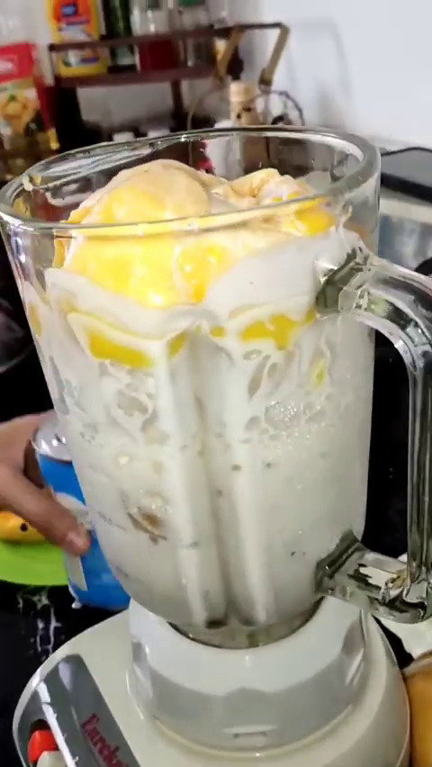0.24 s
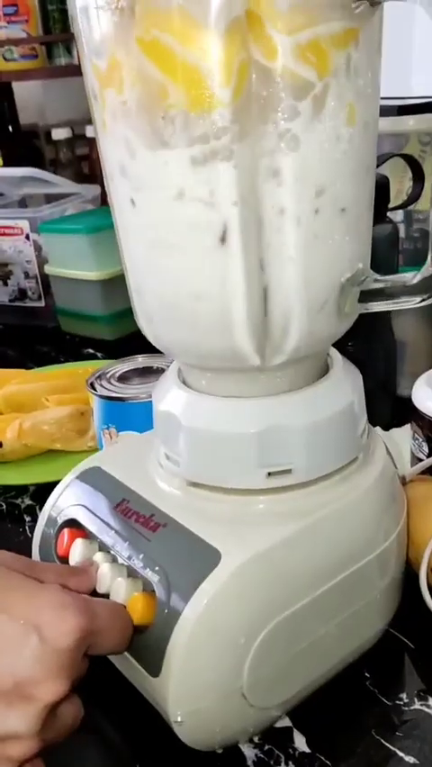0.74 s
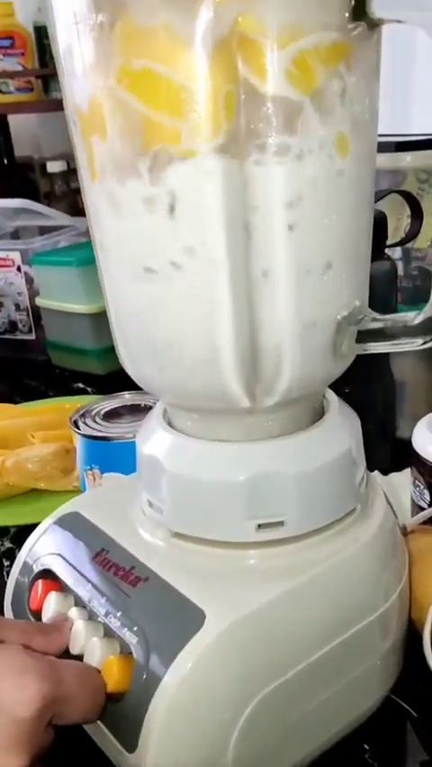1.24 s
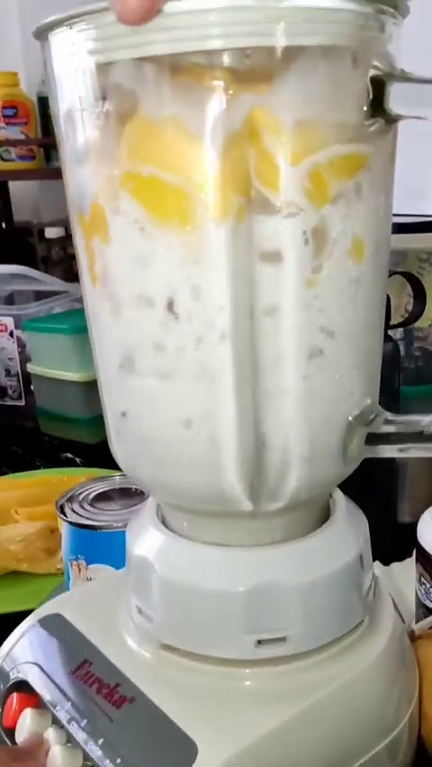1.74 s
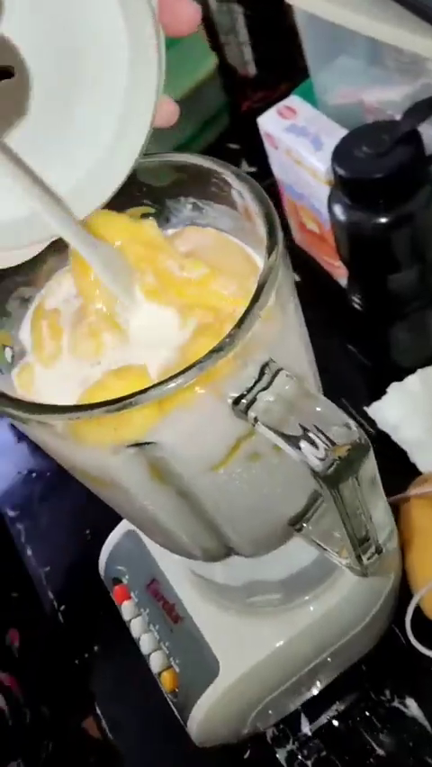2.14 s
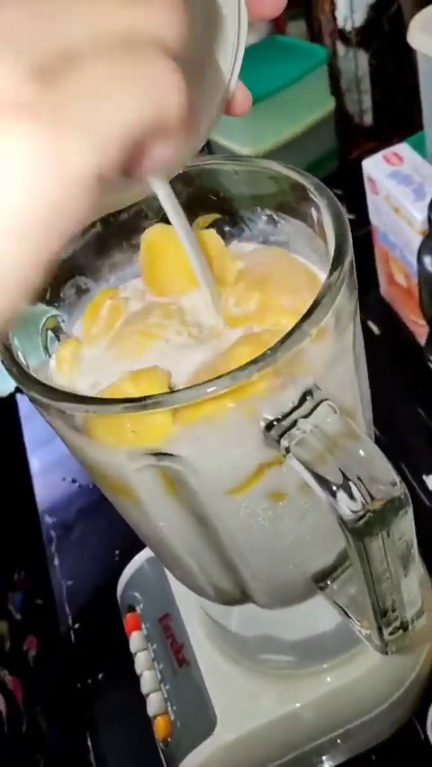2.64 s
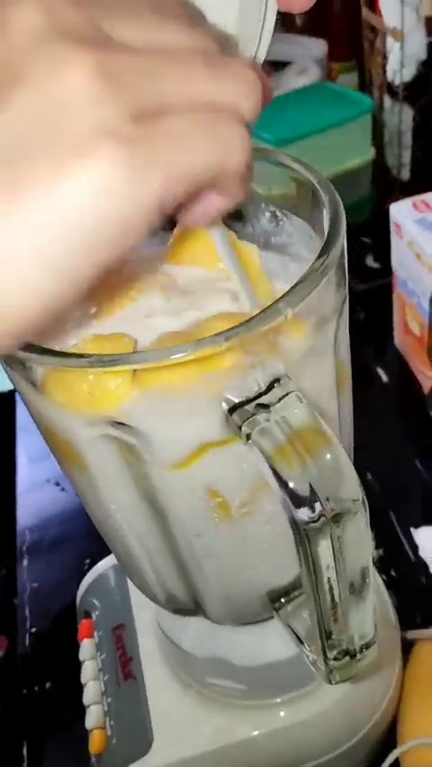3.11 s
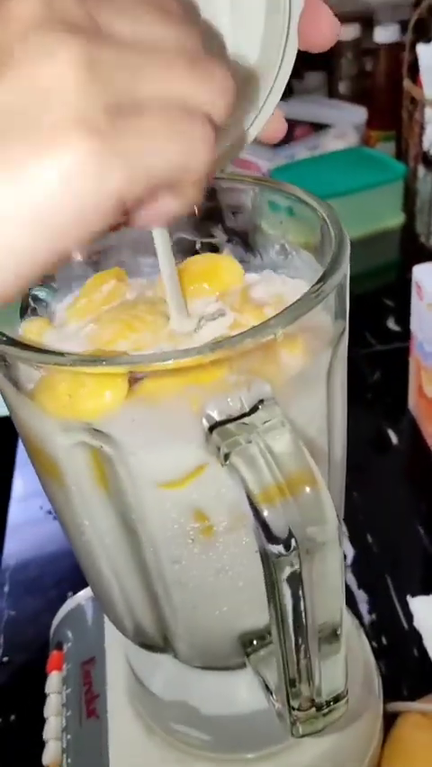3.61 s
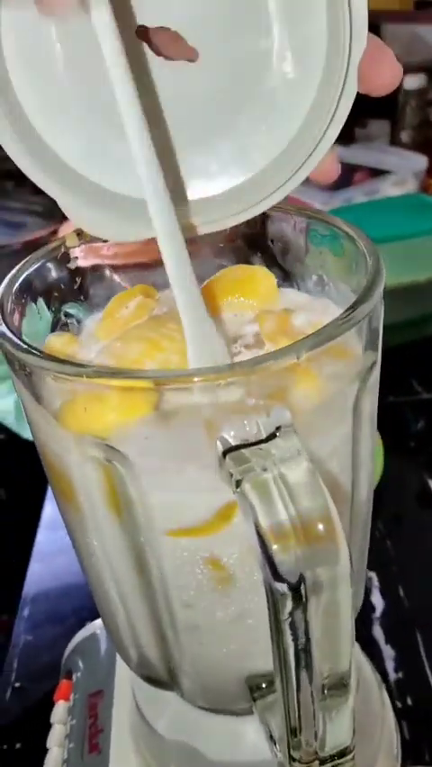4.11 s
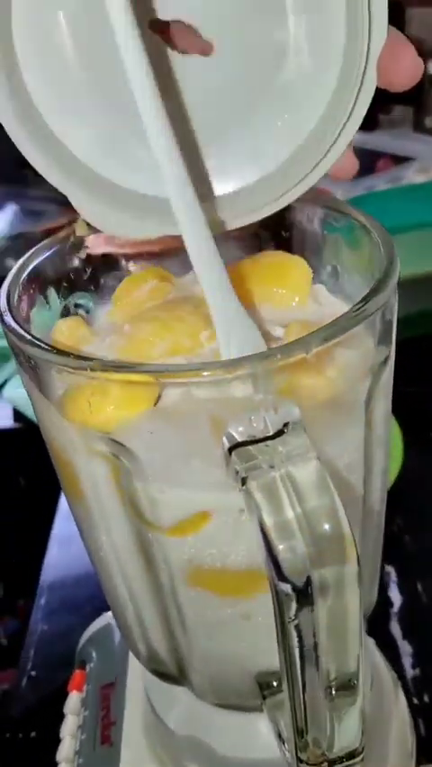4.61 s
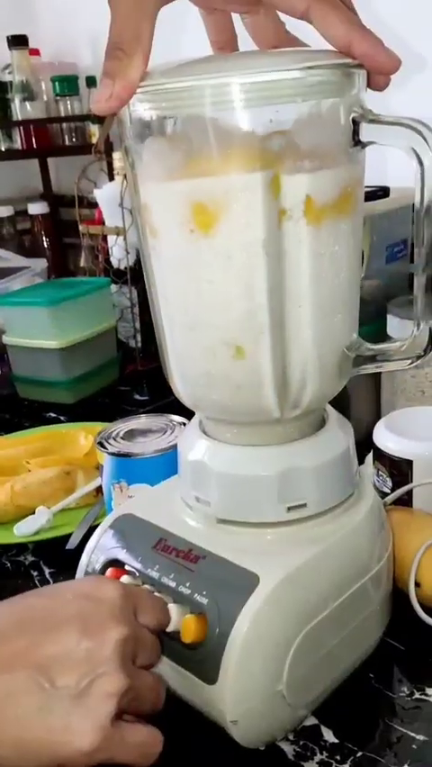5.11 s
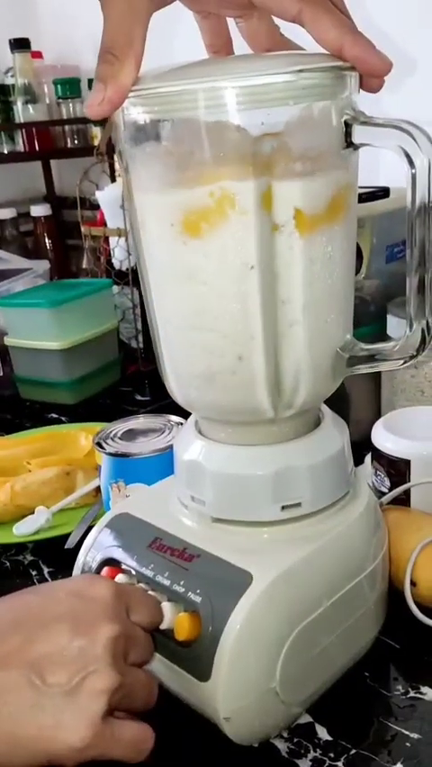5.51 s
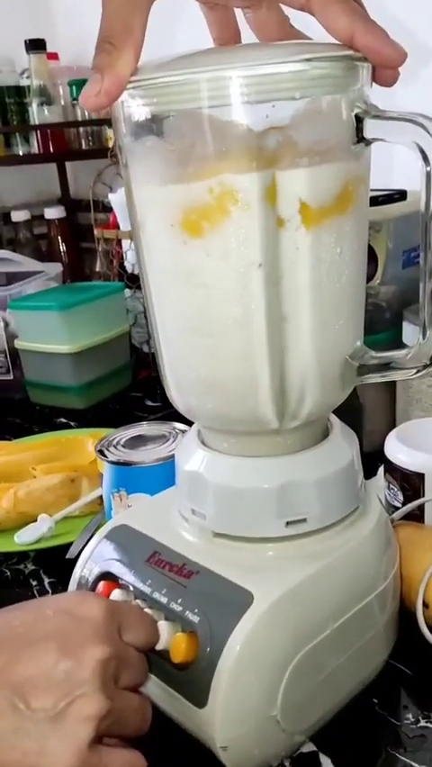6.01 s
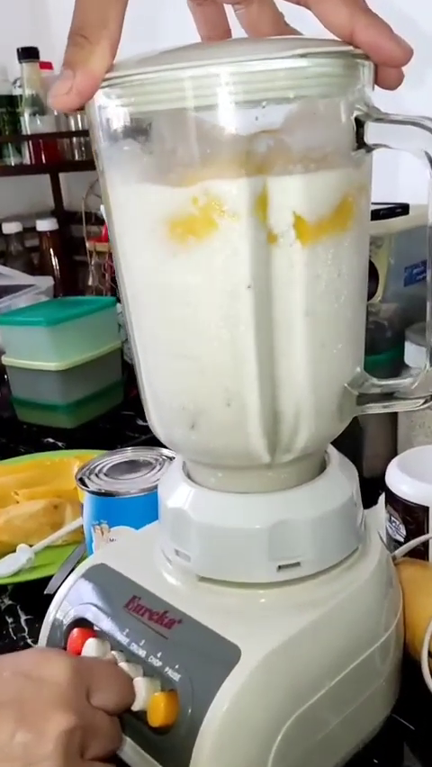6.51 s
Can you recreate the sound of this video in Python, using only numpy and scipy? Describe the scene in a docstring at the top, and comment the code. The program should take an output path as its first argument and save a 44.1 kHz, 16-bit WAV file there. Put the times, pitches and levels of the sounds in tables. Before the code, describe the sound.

A faint appliance hum over soft hiss opens the scene, close up in a small kitchen with a very short echo. At about 0.45 seconds a blender starts crushing fruit and ice in milk: the liquid churns with hollow gulps, the housing whines, and ice makes a dense, bright rattle against the ringing glass jar, with surges and a few sharp cracks. It stops dead at about 2 seconds. The quiet hum returns, and a spoon pushes through the slush in uneven strokes, squelching, popping small air pockets and crunching ice. Spoon and ice knock on the jar, most sharply around 2.9, 3.2 and 3.6 seconds. At about 4.9 seconds the blender cuts in abruptly again, a little brighter, churning and rattling with occasional ice cracks. It swells near 5.7 seconds and runs until the end, at about 6.7 seconds.

```python
"""A glass-jar blender crushes fruit and ice in milk, close up in a small kitchen. An appliance hums over soft
hiss, then the blades bite: the liquid churns, the housing whines and ice batters the ringing glass. At about 2
s the scene changes abruptly: over the hum, a spoon squelches and crunches through the slush and knocks on the
jar. Near 5 s a second burst cuts in and runs to the end."""
import sys
import numpy as np
from scipy import signal
from scipy.fft import rfft, irfft
from scipy.io import wavfile
from scipy.ndimage import uniform_filter1d

SR = 44100
rng = np.random.default_rng(int(sys.argv[2]) if len(sys.argv) > 2 else 0)


def store_wav(level_fs):
    """Save 16-bit WAV to argv[1]."""
    pcm = np.round(np.clip(np.atleast_2d(level_fs), -1, 1) * 32767)
    wavfile.write(sys.argv[1], SR, pcm.T.astype(np.int16))


N = 297675
TIME = np.arange(N) / SR
HZ = np.fft.rfftfreq(N, 1 / SR)

# the blender rests (start [s], end [s])
PAUSES = [(-.01, .408), (2.056, 4.917)]
# how alike left and right are (frequency [Hz], likeness [0-1])
LIKENESS = [(60, 0.48), (130, 0.7), (350, 0.71), (700, 0.68), (1500, 0.35), (4000, 0.02), (14000, 0)]
# tone of the jar when struck or stirred (frequency [Hz], relative level [dB])
STRUCK_JAR_SLOPE = [(230, -47), (300, -21.5), (480, -12), (800, -12), (1600, -2), (3000, -0.5),
                    (5500, -0.5), (9000, -11), (11500, -3), (14200, -9)]
# its resonances (frequency [Hz], width [Hz], lift over the slope [dB])
STRUCK_JAR_MODES = [(349.5, 57, 22), (613, 130, 13.1), (857, 140, 9), (1080, 270, 9), (1540, 310, 1.5),
                    (1940, 400, 0.3), (4560, 2900, 3.1), (5400, 1100, 1.6), (9100, 2000, 16.1)]


def gain_of(db):
    """Decibels to a factor."""
    return 10 ** (np.asarray(db) / 20)


def unit_rms(x):
    """Scales to an rms of 1 (a stereo pair by its mid signal)."""
    return x / np.sqrt(np.mean(np.atleast_2d(x).mean(0) ** 2) + 1e-20)


def read(points, hz):
    """Reads a spectrum on a log-frequency axis."""
    f, value = np.transpose(points)
    return np.interp(np.log(hz + 1), np.log(f + 1), value)


def curves(rows):
    """Each column after the first as a curve over time."""
    s, *columns = np.transpose(rows)
    return [np.interp(TIME, s, column) for column in columns]


def gate(start, end):
    """Open between two moments, with millisecond edges."""
    return np.clip(np.minimum(TIME - start, end - TIME) * 1000, 0, 1)


def wander(rate_hz):
    """Smooth random drift with an rms of 1."""
    coarse = TIME[::32]
    hz = np.fft.rfftfreq(len(coarse), coarse[1])
    slow = irfft(rfft(rng.standard_normal(len(coarse))) / (1 + (hz / rate_hz) ** 2), len(coarse))
    return np.interp(TIME, coarse, unit_rms(slow))


def below(edge_hz):
    """Low side of a steep crossover, as a gain."""
    return 1 / np.sqrt(1 + (HZ / edge_hz) ** 12)


def above(edge_hz):
    """High side of the same crossover."""
    return np.sqrt(1 - below(edge_hz) ** 2)


def body(slope, modes):
    """Gain of a struck body: resonances on a slope."""
    peaks = sum(db / (1 + (2 * (HZ - hz) / width) ** 2) for hz, width, db in modes)
    return gain_of(read(slope, HZ) + peaks)


def ring(x, gain):
    """Minimum-phase filter: each click in x rings on after it lands."""
    cepstrum = irfft(np.log(np.maximum(gain / gain.max(), 1e-4)), N)
    cepstrum[1:] *= 2 * (np.arange(1, N) < N // 2)
    return irfft(rfft(x) * np.exp(rfft(cepstrum)), N)


def resonate(x, hz, width_hz):
    """A resonance that glides along the curve hz."""
    turn = np.exp(2j * np.pi * np.cumsum(hz) / SR)
    pole = np.exp(-np.pi * width_hz / SR)
    return 2 * (turn * signal.lfilter([1 - pole], [1, -pole], x / turn + 1e-18)).real


def impacts(per_s, spread_db):
    """Random clicks, mostly small; each lands elsewhere, so left and right get it differently."""
    size = gain_of(spread_db * np.minimum(rng.exponential(1, N), 4))
    polarity = rng.choice([-1, 1], (2, N))
    return unit_rms(size * polarity * (rng.random(N) < per_s / SR))


def diffuse(pair):
    """Makes two unrelated signals alike in the bass."""
    a, b = rfft(pair, N)
    same = np.clip(read(LIKENESS, HZ), 0, 1)
    return irfft(np.array([a, same * a + np.sqrt(1 - same ** 2) * b]), N)


def place(pair, pan, lag_ms):
    """Stereo image: alike in the bass, panned by frequency, later on the left; rms 1."""
    side = np.exp(-1j * np.pi * HZ * lag_ms / 1000) * gain_of(read(pan, HZ) / 2)
    return unit_rms(irfft(rfft(diffuse(pair)) * np.array([side, 1 / side]), N))


def appliance_hum():
    """An appliance hums, wavering slightly, over soft hiss; both sound only in the pauses."""
    # hum partials, one table a pause (frequency [Hz], level [dB])
    hum_partials = [
        [(59.2, -49.5), (118.4, -59), (441.4, -62.5)],
        [(59.2, -50.5), (118.4, -61.5), (145.3, -60), (220.7, -71.5), (360.7, -58), (527.6, -65)],
    ]
    # colour of the kitchen hiss (frequency [Hz], relative level [dB])
    hiss_colour = [(25, -6.5), (50, -9), (90, -15), (150, -18), (220, -21.5), (450, -19), (750, -20),
                   (900, -20), (1400, -18.5), (3400, -17), (6000, -20.5), (9200, -17), (11500, -20),
                   (14200, -29.5)]
    noise = irfft(rfft(rng.standard_normal((2, N))) * gain_of(read(hiss_colour, HZ)), N)
    hiss = gain_of(-43.7) * unit_rms(diffuse(noise))
    out = np.zeros((2, N))
    for span, partials in zip(PAUSES, hum_partials):
        hum = np.zeros(N)
        for hz, db in partials:
            level = np.sqrt(2) * gain_of(db + 0.66 * wander(rate_hz=1))
            hum += level * np.sin(2 * np.pi * hz * TIME + 0.52 * wander(rate_hz=1))
        out += (hum + hiss) * gate(*span)
    return out


def blender(burst):
    """Blades churn the liquid, grind pulp, shake the housing and fling ice at the ringing glass."""
    # the motor runs (start [s], end [s])
    burst_spans = [(.449, 2.056), (4.917, 6.76)]
    # slow course of the load, per burst (time [s], churn [dB], housing [dB], ice on glass [dB])
    load_levels = [
        [(.47, -36.5, -32, -27.5), (.56, -32.5, -31.5, -26), (.64, -30.5, -27.5, -21),
         (.81, -34.5, -29.5, -25.5), (1.06, -31.5, -26.5, -23), (1.13, -24.5, -28, -23),
         (1.33, -30.5, -27.5, -24), (1.46, -26.5, -23, -19), (1.7, -31.5, -28, -24), (2.05, -31, -27.5, -22.5)],
        [(4.92, -32, -26, -21.5), (5.17, -30.5, -26.5, -20.5), (5.42, -29.5, -27, -22), (5.58, -28, -24, -20.5),
         (5.72, -28.5, -21, -16), (5.825, -34.5, -28, -22.5), (5.96, -28.5, -26.5, -21.5),
         (6.22, -31, -28.5, -23), (6.37, -31.5, -27, -22), (6.75, -34, -26, -22.5)],
    ]
    # how freely things ring as the load shifts, per burst
    # (time [s], whine re housing [dB], low glass ring re ice [dB], high glass ring re ice [dB])
    ring_levels = [
        [(.5, -24, -10, -14), (.72, -16, -9, -9), (1, -23, -1, -5.5), (1.2, -19, -17, -17),
         (1.45, -10.5, -2.5, -10), (1.66, -2.5, -1, -10), (1.8, -6.5, -6, -20), (1.93, -6.5, -20, -4.5),
         (2.05, -8, -13, -17)],
        [(4.95, -7, -21, -5.5), (5.25, -8, -16, -4), (5.42, -12, -27, -17), (5.7, -8, -21, -6),
         (5.9, -9, -16, -13), (6.12, -13, -4, -10), (6.3, -6, -17, -7), (6.48, -6, -7, -5),
         (6.66, -5, -0.5, -8)],
    ]
    # tone of jar and housing, per burst (frequency [Hz], relative level [dB])
    jar_slopes = [
        [(700, -15), (1000, -11), (1400, -11.5), (2050, -1.5), (2500, -3.5), (2900, -9), (4500, -8.5),
         (6200, -14.5), (8200, -13), (8900, -4.5), (9700, -11.5), (10500, -6.5), (11050, -12), (11500, -15),
         (12700, -15), (14200, -19.5)],
        [(700, -11), (1000, -15), (1500, -14.5), (2100, -7.5), (2600, -10.5), (3300, -12.5), (4500, -10.5),
         (6200, -12), (7600, -8.5), (8500, -4.5), (9600, -3), (10500, -4), (11050, -6.5), (12000, -8),
         (14200, -15)],
    ]
    # peaks and dips in their tone (frequency [Hz], width [Hz], lift over the slope [dB])
    jar_modes = [(1103, 180, 3), (1510, 98, 3), (3090, 87, 2.5), (3580, 98, 0), (4114, 110, 3.5),
                 (4300, 180, -1), (5360, 40, 10), (5810, 115, 7), (6300, 270, 2), (6760, 140, 6.5),
                 (7370, 120, 2.5)]
    # stereo balance, per burst (frequency [Hz], left minus right [dB])
    blender_pans = [
        [(60, -3), (200, 5.5), (700, 6), (1200, 6), (2000, 1.5), (2700, 3.5), (3300, 6.5), (4200, 4), (5000, 3),
         (7500, 0.5), (8500, 1), (8900, -8), (9300, -8.5), (9700, 6), (10400, 3), (11000, 17), (11900, 2),
         (13200, 7), (14500, -1)],
        [(60, -3), (200, 5), (1000, 5.5), (1400, 2), (2600, 4), (3100, 6.5), (4600, 1.5), (5300, 1.5),
         (5850, 5.5), (6700, -1), (8000, -2.5), (9250, -5), (9700, 2), (10400, 8), (11000, 6.5), (12400, 5.5),
         (14500, 6)],
    ]
    start, end = burst_spans[burst]
    pan = blender_pans[burst]

    churn_db, housing_db, ice_db = curves(load_levels[burst])
    whine_db, low_ring_db, high_ring_db = curves(ring_levels[burst])
    rattle_surge, churn_surge = ice_catches()
    ice_db += rattle_surge
    housing_db += 0.83 * rattle_surge  # only part of a surge reaches the housing
    churn_db += churn_surge
    pulp_db = -30.5 + 0.93 * (churn_db + 28)  # follows the churn around its usual -28 dB
    churn_db += vortex_gulps(start, end)
    whine_db += 2 * wander(rate_hz=22)

    throb = 1 + 0.025 * np.cos(2 * np.pi * 60 * TIME)  # the motor's pull pulses with the mains
    lumps = gain_of(wander(rate_hz=23)) * throb  # small pieces are caught and let go
    showers = lumps * blade_beat() * gain_of(0.52 * wander(rate_hz=72))  # ice hits the glass unevenly
    jar = body(jar_slopes[burst], jar_modes)
    pulp = ring(impacts(per_s=4000, spread_db=3) * lumps, jar * above(927) * below(1465))
    housing = ring(impacts(per_s=9000, spread_db=2) * lumps, jar * above(1356) * below(5100))
    ice = ring(impacts(per_s=9000, spread_db=1) * showers, jar * above(5850))

    sound = gain_of(churn_db) * place(churning(burst, lumps), pan, lag_ms=0.11)
    sound += gain_of(pulp_db) * place(pulp, pan, lag_ms=0.25)
    sound += gain_of(housing_db) * place(housing, pan, lag_ms=0.41)
    sound += gain_of(ice_db) * place(ice, pan, lag_ms=0.4125)
    sound += gain_of(housing_db + whine_db) * singing(lumps, pan, hz=2315, width_hz=110)
    sound += gain_of(ice_db + low_ring_db) * singing(showers, pan, hz=8930, width_hz=480)
    sound += gain_of(ice_db + high_ring_db) * singing(showers, pan, hz=9230, width_hz=220)
    bite_s = 0.019 if burst == 0 else 0.0039
    attack = 1 - np.exp(-np.maximum(TIME - start, 0) / bite_s)
    return kitchen(flutter(sound, depth_db=3.5) * attack, wet_db=-11) * gate(start, end)


def churning(burst, lumps):
    """Dense slaps of liquid boom in the hollow of base and jar."""
    # tone of the churn, per burst (frequency [Hz], relative level [dB])
    churn_slopes = [
        [(18, -42), (30, -20), (96, -24.5), (160, -22.5), (200, -16), (243, -18.5), (284, -7.5), (389, -1),
         (442, -1), (502, -11), (587, -8), (717, -7.5), (838, -11), (900, -4), (1170, -27), (1980, -120)],
        [(18, -69), (30, -24), (65, -24.5), (96, -35.5), (123, -22), (190, -26), (240, -28.5), (300, -8.5),
         (337, -2), (400, 1), (474, -7), (517, -17), (587, -14), (658, -20.5), (900, -3), (1170, -48),
         (1980, -120)],
    ]
    # hollow resonances (frequency [Hz], width [Hz], lift over the slope [dB])
    hollow_modes = [(302, 25, -1.5), (424, 81, 0.5), (594, 37, 3.5), (668, 37, -2)]
    hollow = body(churn_slopes[burst], hollow_modes) * below(786)
    return ring(impacts(per_s=2000, spread_db=1) * lumps, hollow)


def blade_beat():
    """The ice rattle swells briefly once in every turn of the blades."""
    # the motor labours in the thick load and frees itself (time [s], speed [turns/s], beat depth [-])
    motor_course = [(.45, 40, .08), (.55, 120, .1), (.68, 132, 0.22), (1.0, 116, 0.11), (2.05, 150, .05),
                    (4.92, 150, .05), (5.05, 160, .15), (5.3, 152, 0.14), (5.5, 155, 0.047),
                    (5.97, 159, 0.073), (6.12, 162, 0.19), (6.33, 164, 0.33), (6.48, 170, 0.3),
                    (6.75, 171, 0.23)]
    speed_hz, depth = curves(motor_course)
    turn = 2 * np.pi * np.cumsum(speed_hz) / SR
    return np.exp(depth * (np.cos(turn) + 0.63 * np.cos(2 * turn) + 0.3 * np.cos(3 * turn)))


def singing(drive, pan, hz, width_hz):
    """A strong mode of housing or glass, fed by dense impacts and detuned a little by the load."""
    pitch = hz * (1 + 0.0032 * wander(rate_hz=3.8))
    hits = impacts(per_s=3000, spread_db=0.5) * drive
    tone = resonate(resonate(hits, pitch, width_hz), pitch, width_hz)
    left_db = read(pan, hz)
    return unit_rms(tone * gain_of(np.array([[left_db], [-left_db]]) / 2))


def flutter(x, depth_db):
    """Random, brief dips and lifts in narrow bands between 1.4 and 8.3 kHz make the rattle waver."""
    hz, _, spectra = signal.stft(x, SR, nperseg=1024)
    patches = uniform_filter1d(rng.standard_normal(spectra.shape[1:]), size=4, axis=0)
    patches = uniform_filter1d(patches, size=8, axis=1)
    band = (hz > 1400) & (hz < 8300)
    gain = gain_of(depth_db * np.minimum(patches / patches.std(), 1) * band[:, None])
    return signal.istft(spectra * gain, SR, nperseg=1024)[1][:, :N]


def vortex_gulps(start, end):
    """The vortex gulps and the churn thumps: extra dB over time."""
    # gulps (time [s], level change [dB])
    gulp_peaks = [(.635, 2.5), (.667, 3), (.755, 6), (.885, 7.5), (.915, -2), (1.205, -0.5), (1.262, 4.5),
                  (1.401, 9), (1.453, 6.5), (1.51, -8), (1.872, 7), (2.045, 9), (4.945, 6.5), (5.165, 0),
                  (5.385, 1), (5.44, 7.5), (5.495, 2), (5.552, 4.5), (5.6, 3.5), (5.625, 2), (5.755, 4),
                  (6.03, 2), (6.55, 5)]
    half_length_s = 0.0076
    return sum(db * np.exp(-((TIME - s) / half_length_s) ** 2) for s, db in gulp_peaks if start < s < end)


def ice_cracks():
    """Large pieces of ice crack against the glass while blending."""
    # (time [s], level [dB], centre [Hz], breadth [octaves], contact [s], left minus right [dB])
    crack_hits = [(.643, -18, 2110, .6, .001, -2), (.826, -8.5, 9280, 0.26, .0015, -3),
                  (.884, -10, 9250, .3, .001, -1), (1.349, -6, 8900, .2, .001, -5),
                  (1.568, -19, 9220, .2, 0.0007, -1), (1.659, -8, 8960, .15, .0012, -9),
                  (4.921, -18, 10000, 0.36, 0.0014, 5), (4.98, -9, 9200, .6, .0005, 2),
                  (5.106, -7, 9200, 0.41, 0.00037, -2), (5.297, -9, 9100, .2, .0015, -4),
                  (5.738, -12, 9200, .6, .0005, 0), (6.68, -12, 8940, .2, .001, -7)]
    return strike_jar(crack_hits, snap=.08, chatter=.1, chatter_s=.005)


def strike_jar(hits, snap, chatter, chatter_s):
    """Single hard contacts with a faint chatter: dull under the milk, bright at the rim."""
    size = 4096
    t, hz = TIME[:size], np.fft.rfftfreq(size, 1 / SR)
    impulse = 1. * (TIME == 0)
    jar = rfft(ring(impulse, body(STRUCK_JAR_SLOPE, STRUCK_JAR_MODES) * above(230))[:size])
    out = np.zeros((2, N))
    for s, db, centre_hz, octaves, contact_s, left_db in hits:
        force = t / contact_s * np.exp(1 - t / contact_s) + chatter * np.exp(-t / chatter_s)
        a, b = rng.standard_normal((2, size)) * force
        same = np.clip(read(LIKENESS, centre_hz), 0, 1)
        contact = np.array([a, same * a + np.sqrt(1 - same ** 2) * b])
        band = 1 / (1 + (np.log2((hz + 1) / centre_hz) / octaves) ** 2)
        colour = snap + band  # the first touch snaps at every pitch
        knock = np.roll(irfft(rfft(contact) * jar * colour), 20, axis=1)
        knock *= gain_of(db + np.array([[left_db], [-left_db]]) / 2) / abs(knock.mean(0)).max()
        slot = out[:, round(s * SR):][:, :size]
        slot += knock[:, :slot.shape[1]]
    return out


def ice_catches():
    """The blades catch a lump and the noise surges, or run free and it dips: extra dB over time."""
    # (middle [s], length [s], rattle change [dB], churn change [dB])
    catch_surges = [(0.738, 0.13, 5, 5.5), (0.802, 0.032, -3.5, -4), (0.838, 0.062, 1.5, 6),
                    (0.895, 0.066, 3.5, 7), (0.955, 0.034, -2, 0.5), (0.997, 0.036, 2.5, 5.5),
                    (1.162, 0.021, 4.5, 3), (1.272, 0.1, 2, 2.5), (1.38, 0.076, 1.5, 1),
                    (1.462, 0.072, -2, -2.5), (1.646, 0.095, 1.5, -1.5), (1.765, 0.06, 4, 2.5),
                    (1.92, 0.093, 3, -0.5), (2.061, 0.091, 4, -3.5), (5.005, 0.079, 0.5, 0.5),
                    (5.078, 0.056, 2, 2), (5.305, 0.047, -0.5, 1), (5.517, 0.039, 2, 0.5),
                    (5.693, 0.099, -2, -0.5), (5.786, 0.052, 2, 2), (5.882, 0.082, 2.5, 2),
                    (6.03, 0.068, 2.5, -1.5), (6.133, 0.13, 3.5, -0.5), (6.302, 0.13, 2, 0),
                    (6.426, 0.085, 1.5, 1), (6.684, 0.041, 2, 4.5)]
    edge_s = 0.012
    rattle, churn = np.zeros((2, N))
    for middle, length, rattle_db, churn_db in catch_surges:
        held = np.clip((length / 2 - abs(TIME - middle)) / edge_s, 0, 1)
        rattle += rattle_db * held
        churn += churn_db * held
    return rattle, churn


def stirring():
    """The spoon shoves wet fruit, pops air pockets and grates ice on ice, in clumps of small grains."""
    # strokes (full push [s], build [dB/s], hold [s], fade [dB/s], squelch [dB], crunch [dB],
    # pitch of the air pocket behind the spoon [Hz])
    spoon_strokes = [(2.063, 497, 0.0087, 151, -37.5, -41, 1120), (2.202, 157, 0.023, 105, -57, -47, 1490),
                     (2.343, 450, 0.032, 122, -44.5, -27.5, 1260),
                     (2.404, 350, 0.082, 184, -36, -32.5, 1480),
                     (2.628, 330, 0.0075, 300, -39, -34.5, 1710), (2.698, 400, 0.016, 77, -55, -35.5, 1430),
                     (2.825, 243, 0.014, 193, -32.5, -33.5, 1160),
                     (3.141, 600, 0.023, 202, -43.5, -44, 1500), (3.195, 600, 0.032, 101, -34.5, -30, 1430),
                     (3.303, 400, .005, 300, -52, -41, 1500), (3.42, 200, 0.017, 178, -46.5, -41.5, 1480),
                     (3.611, 388, 0.011, 120, -30, -25, 1090), (4.049, 402, 0.065, 117, -33, -32, 1260),
                     (4.41, 1400, 0.011, 77, -36, -32, 1300), (4.497, 500, 0.0081, 84, -39.5, -35, 1910),
                     (4.695, 400, 0.0093, 220, -48.5, -48, 1940),
                     (4.884, 500, 0.022, 400, -33.5, -29.5, 1900)]
    # stereo balance (frequency [Hz], left minus right [dB])
    spoon_pan = [(60, 1.0), (180, -6), (550, 1), (1650, -1.5), (4970, 0.5), (7500, -6.5), (9100, -10),
                 (10800, 8), (15000, 4)]
    pushes = np.array([spoon_push(*row[:4]) for row in spoon_strokes])
    squelch_db, crunch_db, stroke_hz = np.transpose(spoon_strokes)[4:]
    wet, icy = gain_of(squelch_db) @ pushes, gain_of(crunch_db) @ pushes
    jar = body(STRUCK_JAR_SLOPE, STRUCK_JAR_MODES)
    clumps = gain_of(2 * wander(rate_hz=36))
    squelch = ring(impacts(per_s=1300, spread_db=4) * clumps, jar * above(170) * below(2600))
    pocket_hz = stroke_hz[pushes.argmax(0)] * np.exp(0.17 * wander(rate_hz=10))  # bubbles vary in size
    pops = impacts(per_s=330, spread_db=5)
    pockets = resonate(resonate(pops, pocket_hz, width_hz=550), pocket_hz, width_hz=680)
    crunch = ring(impacts(per_s=1600, spread_db=0.5) * clumps, jar * above(2400))
    sound = wet * place(squelch, spoon_pan, lag_ms=0.12)
    sound += wet * gain_of(-6) * place(pockets, spoon_pan, lag_ms=0.07)
    sound += icy * place(crunch, spoon_pan, lag_ms=0.041)
    return sound * gate(*PAUSES[1])


def spoon_push(s, build_db_per_s, hold_s, fade_db_per_s):
    """Envelope of one stroke: it builds, holds, fades, and dies faster as the spoon lifts out."""
    lift_after_s, lift_db_per_s = 0.05, 63
    t = TIME - s
    fade_db = fade_db_per_s * np.maximum(t - hold_s, 0)
    lift_db = lift_db_per_s * np.maximum(t - lift_after_s, 0)
    return gain_of(build_db_per_s * np.minimum(t, 0) - fade_db - lift_db)


def spoon_knocks():
    """Spoon and ice knock on the jar during the stirring."""
    # (time [s], level [dB], centre [Hz], breadth [octaves], contact [s], left minus right [dB])
    knock_hits = [(2.265, -30, 9440, .3, .0007, -5), (2.3, -18, 9100, 0.19, .001, 3),
                  (2.309, -17.5, 9100, .15, .0011, -15), (2.341, -17.5, 9080, 0.32, .0015, -13),
                  (2.362, -19.5, 1130, .4, 0.00085, -1), (2.378, -19, 1300, .4, 0.00079, -1),
                  (2.397, -16, 8730, .2, 0.0029, -12), (2.404, -18, 9210, .2, 0.0022, -5),
                  (2.415, -22, 8980, .2, .001, -6), (2.4435, -16, 9370, 0.35, 0.00097, 0),
                  (2.4505, -15.5, 8800, 0.17, 0.00083, -16), (2.463, -26, 8850, .3, 0.0011, -1),
                  (2.482, -18, 1100, 0.52, 0.00086, -2), (2.631, -14, 5500, 0.5, 0.0012, -4),
                  (2.656, -21, 5240, 0.26, .0006, 0), (2.691, -23, 6760, .5, 0.00077, -6),
                  (2.803, -17.5, 5400, 0.2, 0.0012, -5), (2.818, -22, 1600, 0.31, 0.0019, -5),
                  (2.827, -19, 1080, 0.56, 0.0023, 1), (2.8831, -5, 7200, 0.56, 0.00023, 2),
                  (3.1688, -4.5, 6800, 1, 0.0011, -3.5), (3.1922, -7.5, 1390, 0.43, 0.00028, 3),
                  (3.203, -13, 1200, .4, 0.0006, 5), (3.209, -17, 3500, 1, 0.0011, -8),
                  (3.239, -16, 1660, 0.25, 0.0011, 11), (3.344, -28.5, 520, 0.26, .002, -4),
                  (3.588, -14, 980, 0.45, 0.00049, -1), (3.6085, -4.5, 4700, 0.93, 0.00053, -2),
                  (3.639, -17, 1060, 0.22, 0.00068, -6), (3.713, -27, 1060, .4, .001, -1.5),
                  (3.736, -28, 1100, .3, 0.0012, 1), (3.862, -27.5, 1600, 0.87, .0006, -4),
                  (4.039, -16, 1200, 1, .0015, 0), (4.061, -21, 3480, .7, 0.0012, 0),
                  (4.072, -17.5, 4900, 0.46, 0.0022, 0), (4.099, -19, 1080, .4, .0008, 8),
                  (4.141, -18, 1080, .4, 0.0012, 8), (4.251, -26, 9500, 0.86, 0.00084, -6),
                  (4.411, -18.5, 3000, 0.82, 0.00071, -8), (4.5, -16.5, 2250, 0.81, .0008, -6),
                  (4.654, -26.5, 8100, .4, .0006, -8), (4.716, -28, 2760, .4, 0.0011, -3),
                  (4.857, -19.5, 1500, 0.97, 0.00066, 3)]
    return strike_jar(knock_hits, snap=.07, chatter=.09, chatter_s=.007)


def kitchen(x, wet_db):
    """Adds the short tail of a small hard room."""
    # reverb decay (frequency [Hz], time to fall 60 dB [s])
    decay_times = [(200, 0.23), (2000, 0.12), (12000, 0.088)]
    hz, t, spectra = signal.stft(rng.standard_normal((2, SR // 2)), SR, nperseg=256)
    decay = gain_of(-60 * t / read(decay_times, hz)[:, None]) * (t > .004)
    tail = signal.istft(spectra * decay, SR, nperseg=256)[1]
    tail = diffuse(tail)[:, :SR // 2]
    tail /= np.linalg.norm(tail[0])
    return x + gain_of(wet_db) * signal.fftconvolve(x, tail, axes=1)[:, :N]


def scene():
    """Two bursts of blending with stirring between them and hum in the pauses."""
    blending = blender(burst=0) + blender(burst=1)
    hits = spoon_knocks() + ice_cracks()
    return blending + kitchen(stirring() + hits, wet_db=-11.5) + appliance_hum()


def record(dry):
    """Soft clipping rounds the highest peaks; a steep low-pass trims the top."""
    ceiling, cutoff_hz = .88, 14350
    rounded = dry / (1 + (dry / ceiling) ** 6) ** (1 / 6)
    low_pass = signal.firwin(511, cutoff_hz, window=("kaiser", 8), fs=SR)
    return signal.oaconvolve(rounded, low_pass[None], "same")


dry = scene()
out = record(dry)
store_wav(out)
```